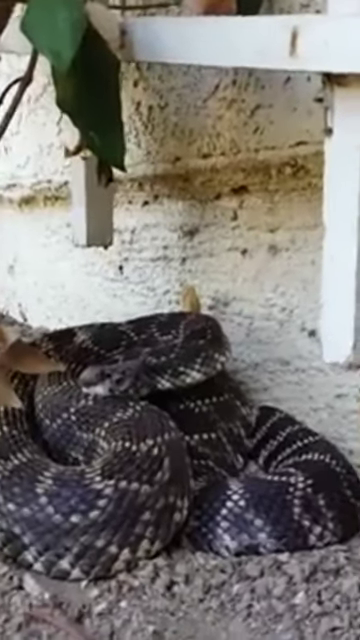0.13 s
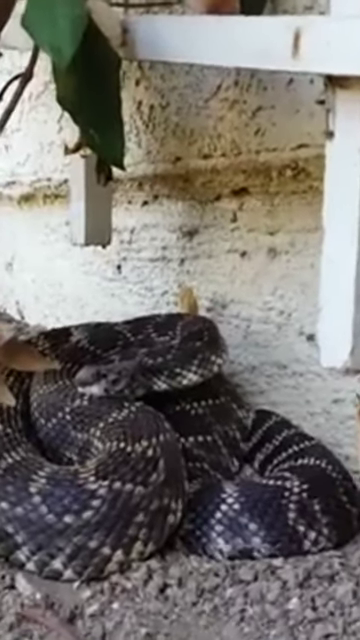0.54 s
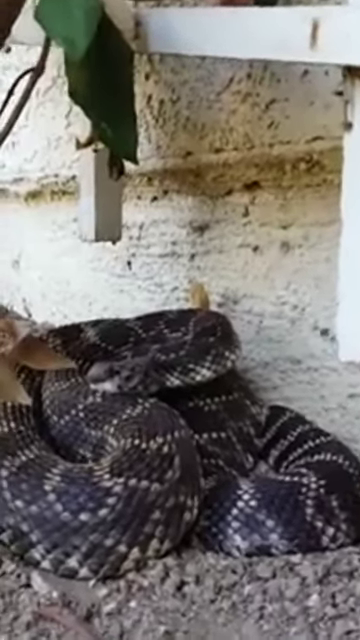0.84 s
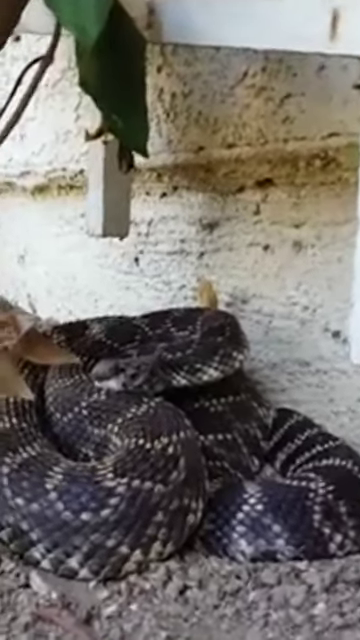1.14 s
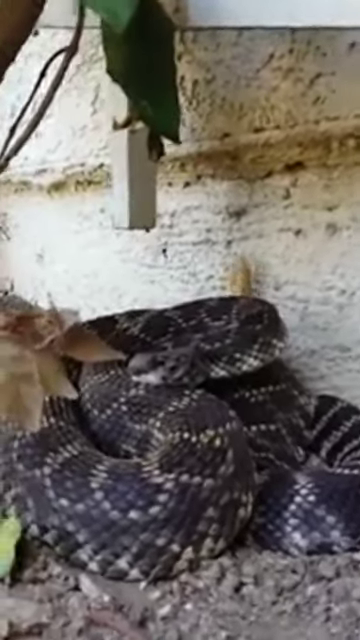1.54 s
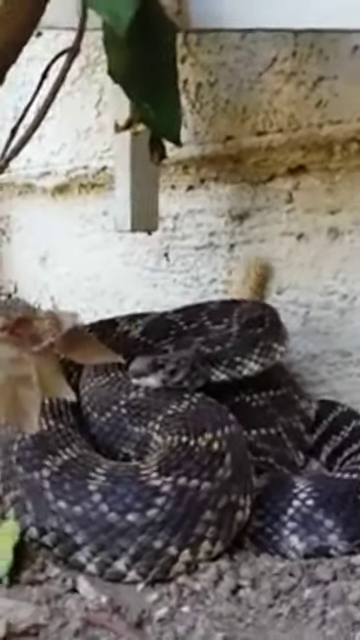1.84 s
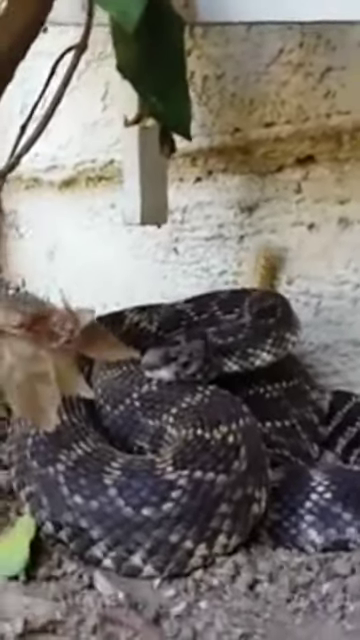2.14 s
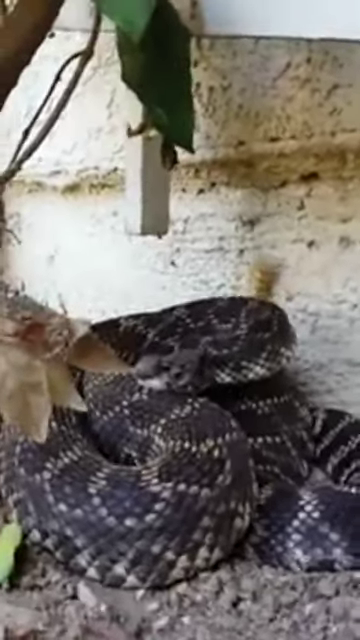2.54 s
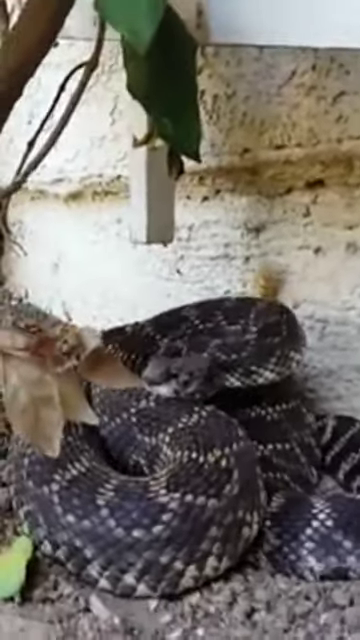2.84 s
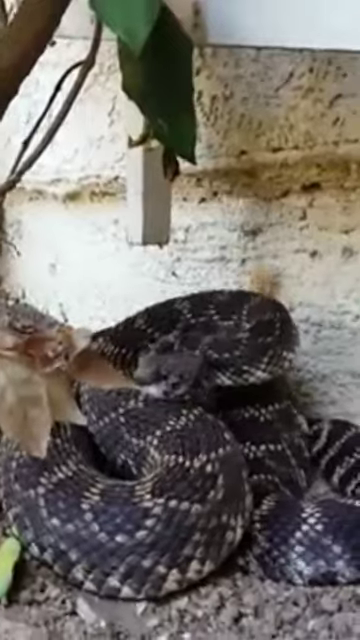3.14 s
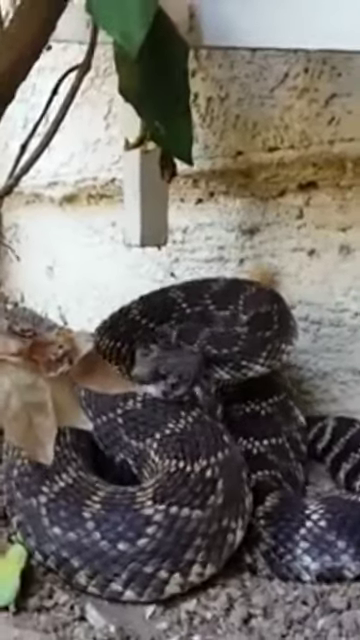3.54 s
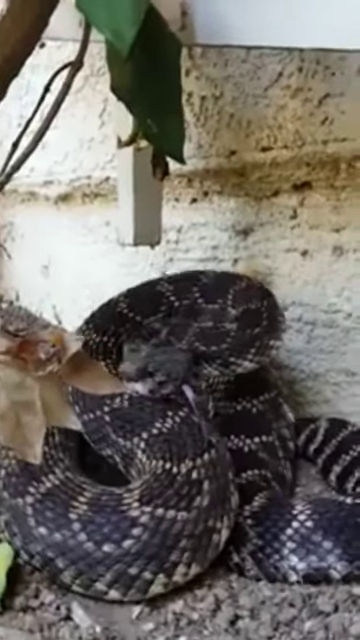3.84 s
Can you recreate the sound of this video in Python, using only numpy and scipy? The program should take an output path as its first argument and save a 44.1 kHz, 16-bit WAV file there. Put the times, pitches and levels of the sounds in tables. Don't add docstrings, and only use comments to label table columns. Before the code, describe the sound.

A rattlesnake's rattle, close by a wall on gravel: quiet rumble and tiny grit ticks first, then at about a second and a half loose clicks quickly thicken into a loud sustained buzz, heard in phone stereo.

```python
import sys
import numpy as np
from scipy import signal
from scipy.fft import rfft, irfft
from scipy.io import wavfile
from scipy.ndimage import uniform_filter1d

SR = 44100
rng = np.random.default_rng(int(sys.argv[2]) if len(sys.argv) > 2 else 0)


def transcribe(signal):
    frames = np.atleast_2d(signal).T
    limited = np.clip(frames, -1, 1)
    pcm = np.round(limited * 32767).astype(np.int16)
    wavfile.write(sys.argv[1], SR, pcm)


def level_to_linear(level):
    exponent = np.asarray(level, float) / 20
    return 10 ** exponent


N = 176400


def evened(x):
    return x / np.sqrt(np.mean(x ** 2) + 1e-20)


def read(points, hz):
    f, value = np.transpose(points)
    return np.interp(np.log(hz + 1), np.log(f + 1), value)


def curve(points, order=1):
    rows = np.transpose(points)
    return np.interp(np.arange(N) / SR, rows[0], rows[order])


def sides(pan_db):
    return level_to_linear(np.array([[pan_db / 2], [-pan_db / 2]]))


def add(mix, s, sound):
    part = mix[:, round(s * SR):][:, :sound.shape[1]]
    part += sound[:, :part.shape[1]]


def resonate(x, hz, width):
    r = np.exp(-np.pi * width / SR)
    return signal.lfilter([1 - r, 0, r - 1], [1, -2 * r * np.cos(2 * np.pi * hz / SR), r * r], x)


def wander(per_s):
    steps = rng.standard_normal(400)
    return evened(np.interp(np.arange(N) / SR * per_s, np.arange(400), steps))


def wash(left, right, same, patchy_db, size):
    hz = np.fft.rfftfreq(size, 1 / SR)
    frames = 4 * N // size + 5
    a, b, c, d, patches = rng.standard_normal((frames, len(hz), 5)).T
    patches = uniform_filter1d(patches, size=5, axis=0)
    patches = evened(uniform_filter1d(patches, size=6, axis=1))
    same = np.clip(same, 0, 1)
    first = a + 1j * b
    second = same * first + np.sqrt(1 - same ** 2) * (c + 1j * d)
    colour_db = np.array([left(hz), right(hz)])[:, :, None]
    z = np.array([first, second]) * level_to_linear(colour_db + patchy_db * patches)
    return evened(signal.istft(z, nperseg=size, noverlap=size * 3 // 4)[1][:, :N])


# time in seconds, rattle level in dB, shakes per second.
TAIL_EFFORT = [
    (1.63, -61.5, 45),
    (1.66, -39, 50),
    (1.72, -40, 58),
    (1.76, -35, 63),
    (1.96, -26, 66),
    (2.12, -22.5, 72),
    (2.5, -21.5, 71),
    (3.2, -21, 69),
    (4.0, -20, 70.4),
]
# start in seconds, level in dB, length in seconds.
LOOSE_KNOCKS = [(1.57, -40.5, 0.006), (1.5864, -36, 0.0053), (1.613, -41.5, 0.008), (1.638, -42, 0.0055),
                (1.65, -31, 0.002), (1.664, -41, 0.0053), (1.668, -46, 0.0053), (1.73, -38, 0.0043),
                (1.760, -37, 0.005), (1.778, -46, 0.0021), (1.806, -39, 0.0041)]


def knocks():
    turns = 2 * np.pi * np.cumsum(curve(TAIL_EFFORT, order=2) * (1 + .02 * wander(8.))) / SR
    t = np.arange(N) / SR
    settle_s, turn_depth, swing_depth = 3.2, .17, .06
    steady = np.minimum(t / settle_s, 1) ** 2 * (1 + .4 * wander(9.))
    bunch = 1 + steady * turn_depth * np.cos(2 * turns) + swing_depth * np.cos(turns)
    bunch = np.maximum(bunch, 0)
    level = level_to_linear(curve(TAIL_EFFORT) + .5 * wander(11.0)) * (t > LOOSE_KNOCKS[0][0])
    busy = np.clip(.12 + 2 * level / level.max(), .02, 1)
    level = level * level_to_linear(3. * (1.15 - busy) * wander(90.))
    for s, db, length in LOOSE_KNOCKS:
        level = level + level_to_linear(db) * (t > s) * np.exp(-np.maximum(t - s, 0) / length)

    knocks_per_s, size_spread_db = 14000, 1.5
    hit, size = rng.random((3, N)), rng.exponential(1, (3, N))
    hit[1:] = np.where(rng.random((2, N)) < busy, hit[1:], hit[0])
    train = (hit < knocks_per_s * busy * bunch / SR) * rng.choice([-1., 1.], (3, N))
    train = evened(train * level_to_linear(size_spread_db * np.minimum(size, 4)) * bunch / np.sqrt(busy))
    body = uniform_filter1d(train, size=3, axis=1)
    sharpness = np.clip(.097 + busy, 0, 1)
    return level * (body + sharpness * (train - body))


def wall(x):
    t60_s, scatter_db = .05, -2
    out, part = x.copy(), rng.integers(0, 3, N)
    for k in range(3):
        taps = np.zeros((len(x), 3000))
        at = np.arange(40, 2980, 20) + rng.integers(0, 20, (len(x), 147))
        echoes = rng.choice([-1., 1.], at.shape) * level_to_linear(-60 * at / SR / t60_s)
        np.put_along_axis(taps, at, echoes, 1)
        taps = level_to_linear(scatter_db) * taps / np.linalg.norm(taps, axis=1)[:, None]
        out = out + signal.oaconvolve(x * (part == k), taps, axes=1)[:, :N]
    return out


# pitch in Hz, level in dB.
PORT_LEFT = [(300, -24.5), (1100, -36), (1500, -20.5), (2500, -6), (5200, -10), (9000, -14.5),
             (12200, -13.5), (15500, -14.5)]
PORT_RIGHT = [(300, -28.5), (1300, -27), (2200, -15.5), (3600, -0.5), (6100, 1.5), (7500, -14),
              (12500, -13), (15500, -16.5)]
# pitch in Hz, width in Hz, gain in dB.
BUMPS_LEFT = [(2866, 200, 5), (3190, 86, -12), (3836, 130, 10.5), (4170, 64, 2.5), (4520, 130, 4.5),
              (5340, 150, 1), (6030, 110, 4), (6700, 260, 0), (7800, 500, 2), (10140, 610, -5)]
BUMPS_RIGHT = [(3787, 69, 2.5), (4010, 60, -6), (4460, 730, 4), (5110, 180, -6.5), (5856, 120, 6.5),
               (6500, 78, -1.5), (7300, 200, 5.5), (8100, 130, 6), (9070, 1200, -24.5), (10800, 300, -5.5)]
# pitch in Hz, likeness from 0 to 1.
RATTLE_LIKENESS = [(600, .5), (1200, .3), (1700, .95), (2500, .72), (6000, .66), (7000, .2), (11400, .42),
                   (12500, .25)]
# pitch in Hz, lead in radians.
LEFT_LEAD = [(900, 0.13), (1500, 3.5), (2300, 2.33), (3000, 3.47), (4000, 4.51), (5000, 5.4), (6000, 9.5),
             (15000, 6.6)]


def rattle():
    size = N + 4096
    hz = np.fft.rfftfreq(size, 1 / SR)
    shared, left, right = rfft(wall(knocks()), size, axis=1)
    same = np.clip(read(RATTLE_LIKENESS, hz), 0, 1)
    lead = np.exp(1j * read(LEFT_LEAD, hz))
    common = shared * np.array([lead, np.ones(len(hz))])
    z = np.sqrt(same) * common + np.sqrt(1 - same) * np.array([left, right])
    colour_db = []
    for tilt, bumps in ((PORT_LEFT, BUMPS_LEFT), (PORT_RIGHT, BUMPS_RIGHT)):
        rings_db = sum(g * np.exp(-.5 * ((hz - f) / w) ** 2) for f, w, g in bumps)
        colour_db.append(read(tilt, hz) + rings_db)
    colour = level_to_linear(np.array(colour_db))
    return irfft(z * colour / np.sqrt(np.mean(colour ** 2)), size, axis=1)[:, :N]


# start in seconds, level in dB, length in seconds, middle pitch in Hz,
# left minus right in dB.
GRIT_TICKS = [(.045, -62, .02, 4200, -4), (.163, -58, .008, 700, 4), (.165, -52.5, .004, 2900, 7),
              (.177, -60, .003, 2500, 5), (.2865, -40.5, .005, 4200, -8), (.288, -49, .005, 550, -3),
              (.2872, -45, .005, 1300, -4), (.4635, -51, .002, 1500, -5), (.4635, -54, .002, 700, -3),
              (.865, -61, .005, 5500, -6), (1.0505, -56, .003, 4300, -5), (1.072, -56, .005, 4000, -6),
              (1.099, -54, .008, 4100, -7), (1.107, -48.5, .004, 4600, -7), (1.101, -54, .013, 1150, -6),
              (1.102, -51, .012, 600, 2), (1.360, -57, .003, 2300, 0), (1.42, -65, .02, 5200, -5),
              (1.932, -53, .006, 700, 0), (1.933, -45, .004, 1900, 0), (2.178, -45, .005, 720, 4),
              (2.179, -45, .004, 1600, 2)]


def grit():
    out = np.zeros((2, N))
    t = np.arange(4000) / SR
    for s, db, length, hz, pan_db in GRIT_TICKS:
        crunch = rng.standard_normal((2, 4000)) * (t < length) * np.minimum(t / 0.00094, 1)
        crunch = crunch + 0.36 * crunch[::-1]
        narrow = resonate(resonate(crunch, hz, hz / 3), hz, hz / 3)
        edge_hz = .4 * hz + 600
        wide = resonate(resonate(crunch, edge_hz, 2200), edge_hz, 2200)
        ring = evened(narrow) + level_to_linear(-4) * evened(wide)
        add(out, s, sides(pan_db) * level_to_linear(db) * ring * np.sqrt(length * SR / len(t)))
    return out


# start in seconds, level in dB, length in seconds, pitch in Hz, blur in Hz.
BIRD_PEEPS = [
    (.352, -61, .03, 3980, 200),
    (.43, -63, .035, 3990, 220),
    (.895, -66, .04, 3960, 250),
    (.96, -67, .08, 3900, 350),
    (1.17, -64, .075, 3200, 400),
    (1.12, -64, .13, 5300, 700),
    (1.13, -65, .12, 4200, 700),
]


def bird():
    out = np.zeros((2, N))
    t = np.arange(4000) / SR
    for s, db, length, hz, width in BIRD_PEEPS:
        puff = rng.standard_normal((2, 4000)) * np.sin(np.pi * np.minimum(t / length, 1))
        blur = evened(resonate(resonate(puff, hz, width), hz, width))
        add(out, s, sides(-8.0) * level_to_linear(db) * blur * np.sqrt(length * SR / len(t)))
    return out


# time in seconds, level in dB.
TRAFFIC_LEVEL = [(0, -45), (.11, -39.5), (.2, -47.5), (.5, -46.5), (.8, -43.5), (1.15, -40), (1.5, -45),
                 (1.75, -46), (1.85, -41), (2.4, -41.5), (3.1, -43.5), (3.7, -41.5), (4, -48)]
# pitch in Hz, level in dB.
TRAFFIC_COLOUR = [(25, -27), (55, -22), (70, 0), (97, -14), (134, 3.5), (170, -12.5), (260, -12),
                  (500, -77)]


def traffic():
    def colour(hz):
        return read(TRAFFIC_COLOUR, hz) - 0.009 * hz
    return level_to_linear(curve(TRAFFIC_LEVEL)) * wash(colour, colour, .8, patchy_db=1.2, size=4096)


# time in seconds, level in dB.
GUST_LEVEL = [(0.0, -47.5), (0.32, -51.5), (0.59, -42.5), (1.05, -46), (1.1, -57), (2.16, -47.5),
              (2.17, -51.5), (3.94, -40.5), (4.0, -44.5)]
# pitch in Hz, level in dB.
GUST_COLOUR = [(100, -24.5), (190, 4.5), (240, -1.5), (320, -3.5), (420, -11.5), (600, -20.5), (900, -62),
               (2000, -52)]
# pitch in Hz, left minus right in dB.
GUST_SIDE = [(200, -2.5), (380, -9), (700, 2)]


def breeze():
    def left(hz):
        return read(GUST_COLOUR, hz) + read(GUST_SIDE, hz) / 2

    def right(hz):
        return read(GUST_COLOUR, hz) - read(GUST_SIDE, hz) / 2
    return level_to_linear(curve(GUST_LEVEL)) * wash(left, right, 0.87, patchy_db=2.0, size=1024)


# time in seconds, level in dB.
LEAVES_LEVEL = [(0, -58.5), (.36, -57.5), (.6, -54), (1.0, -55), (1.24, -56), (1.3, -58.5), (1.6, -55.5),
                (4, -51.5)]
# pitch in Hz, level in dB.
LEAVES_LEFT = [(500, -1.5), (1000, -2), (2200, -6.5), (3300, -6), (6000, -12.5), (10300, -17),
               (12500, -12.5), (15500, -17)]
LEAVES_RIGHT = [(500, 2.5), (1100, -5.5), (1800, 7), (2800, -3.5), (3900, -1), (6000, -6), (9800, -20.5),
                (13000, -13.5)]


def leaves():
    def left(hz):
        return read(LEAVES_LEFT, hz)

    def right(hz):
        return read(LEAVES_RIGHT, hz)
    return level_to_linear(curve(LEAVES_LEVEL)) * wash(left, right, 0.035, patchy_db=2.2, size=512)


# pitch in Hz, level in dB, left minus right in dB.
WHINE_TONES = [(920.5, -77, -12), (1364, -64, 1), (1685, -73, -8), (1836, -75, -8), (2729, -75, 5)]


def whine():
    out = np.zeros((2, N))
    for hz, db, pan_db in WHINE_TONES:
        turns = np.cumsum(hz + 2.5 * wander(25.)) / SR
        out += sides(pan_db) * level_to_linear(db + 3 + wander(12.)) * np.sin(2 * np.pi * turns)
    return out


# pitch in Hz, dB under.
KEPT_DEPTH = [(1000, 60), (7000, 45), (8100, 40), (8500, 27), (10900, 25), (11600, 36), (15500, 40)]


def starved(z, hz):
    faint_db, jitter_db = -118, 3
    edges = np.unique(np.round(np.geomspace(40, 760, num=72)).astype(int))
    power = np.add.reduceat(abs(z) ** 2, edges, axis=-2)[..., :-1, :] / np.diff(edges)[:, None]
    band_db = 10 * np.log10(power + 1e-20)
    depth_db = read(KEPT_DEPTH, hz[edges[:-1]])[:, None]
    limit_db = np.maximum(band_db.max(-2, keepdims=True) - depth_db, faint_db)
    jitter = evened(uniform_filter1d(rng.standard_normal(band_db.shape), size=2, axis=-1))
    keep = band_db + jitter_db * jitter > limit_db
    gate = np.ones(z.shape)
    gate[..., edges[0]:edges[-1], :] = np.repeat(keep, np.diff(edges), axis=-2)
    return z * gate


# pitch in Hz, share of the time from 0 to 1.
GAPS_LOW = [(1380, 0), (1460, .62), (1850, .68), (1980, .42), (2200, .68), (2400, .22), (2700, .05),
            (2980, .15)]
GAPS_HIGH = [(3200, 0), (6700, 0), (7200, .17), (7700, .03), (9500, .06), (10200, .42), (10900, .05),
             (11200, 0)]


def gapped(z, hz):
    luck = rng.standard_normal((len(hz) // 6 + 1, z.shape[1]))
    luck = uniform_filter1d(uniform_filter1d(luck, size=3, axis=1), size=2, axis=0)
    rank = luck.ravel().argsort().argsort().reshape(luck.shape) / luck.size
    rank = np.repeat(rank, 6, axis=0)[:len(hz)]
    treble_db = 10 * np.log10((abs(z[hz > 3000]) ** 2).sum(0) + 1e-20)
    loud = np.clip((treble_db - treble_db.max() + 30) / 10, 0, 1)
    return z * (rank >= read(GAPS_LOW + GAPS_HIGH, hz)[:, None] * loud)


def scene():
    return rattle() + grit() + bird() + traffic() + breeze() + leaves() + whine()


def roll_off(x):
    return signal.sosfilt(signal.butter(12, 16670, fs=SR, output="sos"), x)


def record(dry):
    low_cut_hz, top_hz = 38, 15680
    dry = signal.sosfilt(signal.butter(3, low_cut_hz, "high", fs=SR, output="sos"), dry)
    window = np.sin(np.pi * (np.arange(2048) + .5) / 2048)
    padded = np.pad(dry, ((0, 0), (136, 0)))
    hz, _, z = signal.stft(padded, SR, window, nperseg=2048, noverlap=1024)
    left, right = starved(z * (hz < top_hz)[:, None], hz)
    mid = gapped((left + right) / 2, hz)
    side = (left - right) / 2
    both = np.array([mid + side, mid - side])
    x = signal.istft(both, SR, window, nperseg=2048, noverlap=1024)[1]
    return roll_off(x[:, 136:][:, :N])


dry = scene()
out = record(dry)
transcribe(out)
```